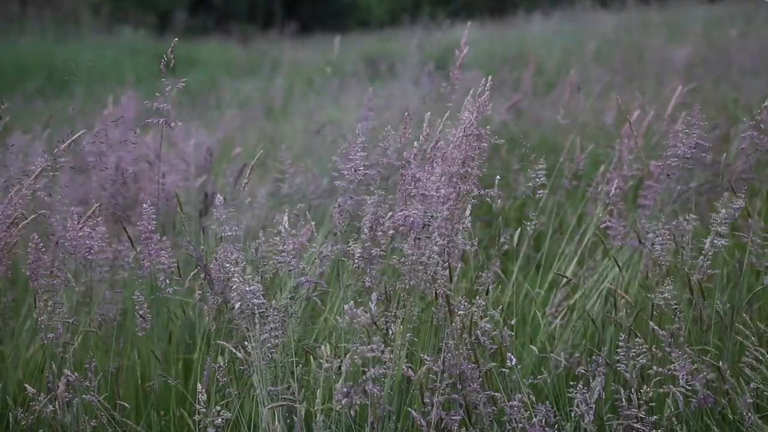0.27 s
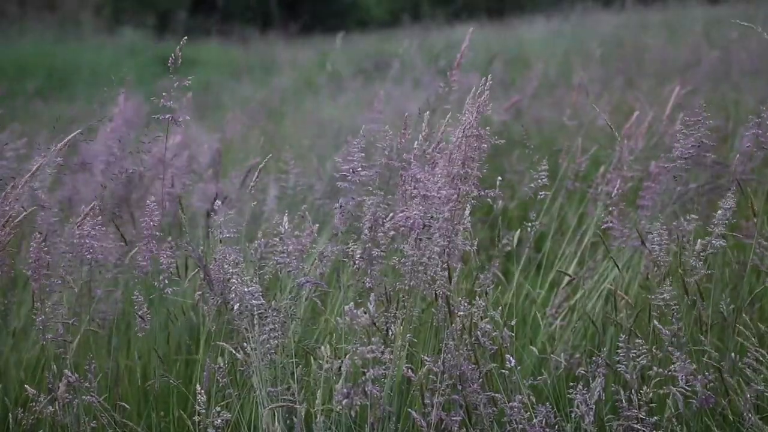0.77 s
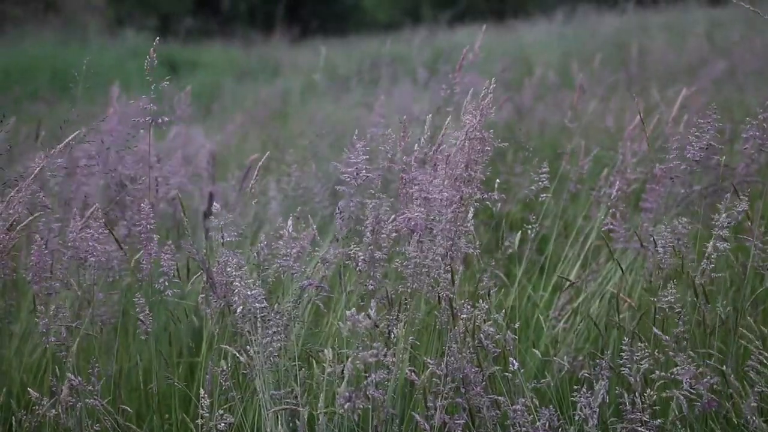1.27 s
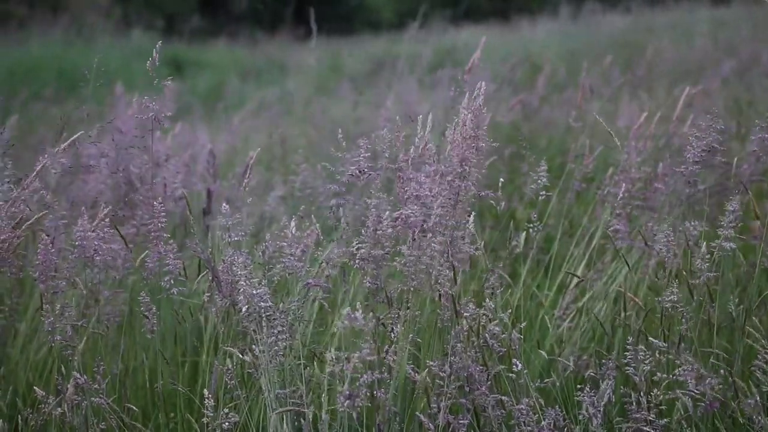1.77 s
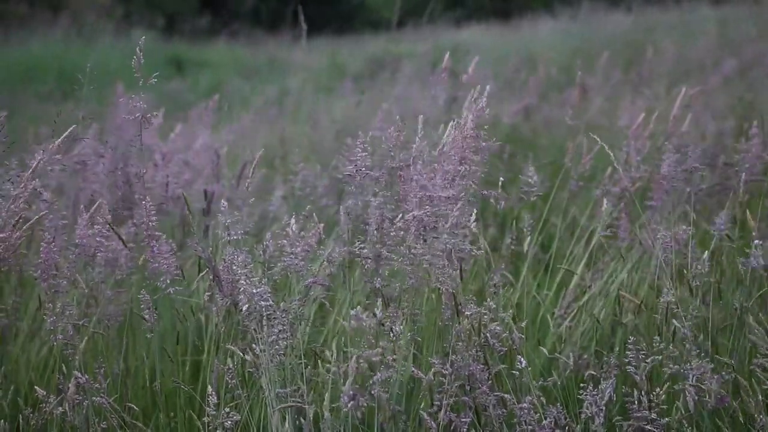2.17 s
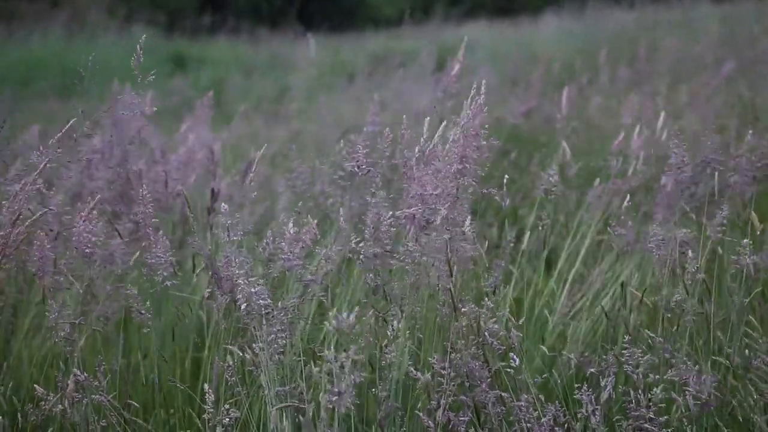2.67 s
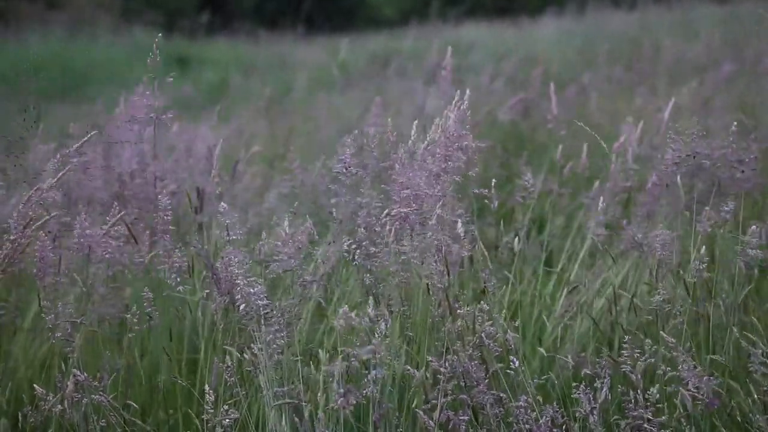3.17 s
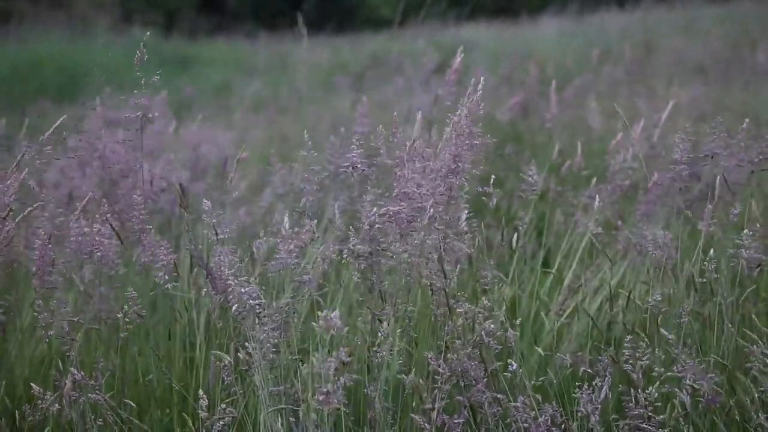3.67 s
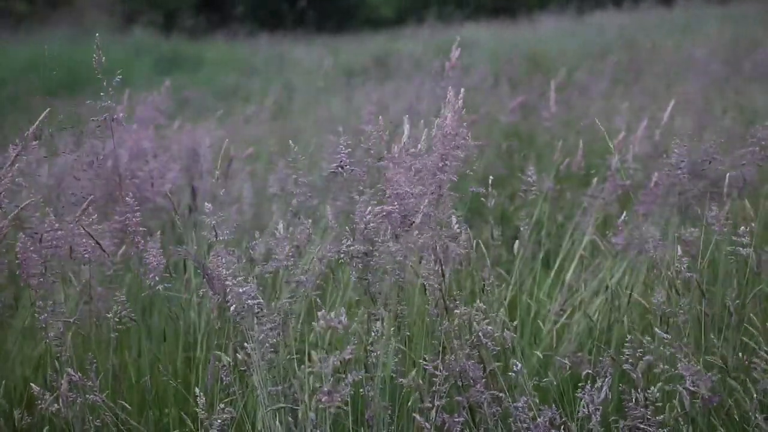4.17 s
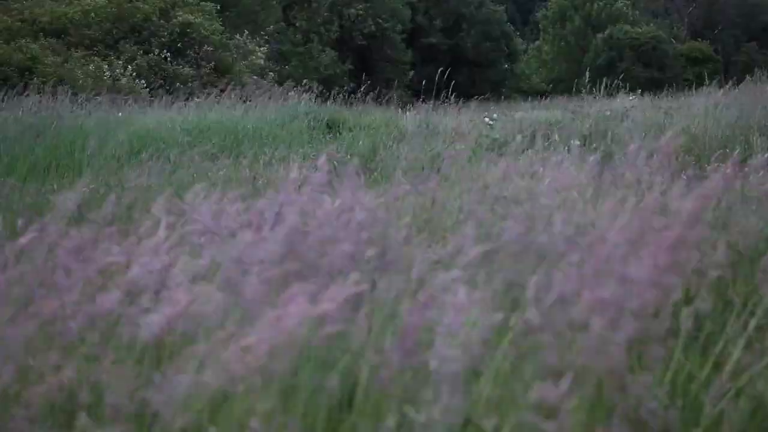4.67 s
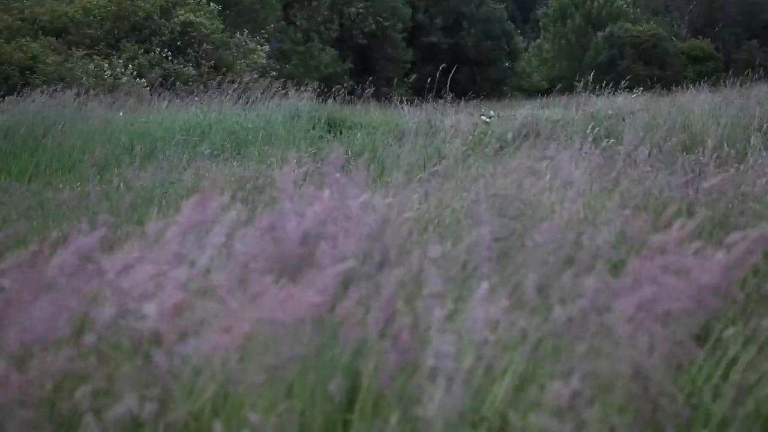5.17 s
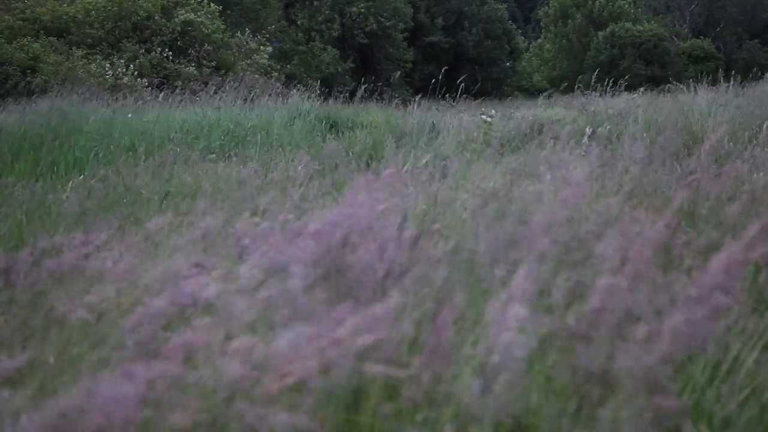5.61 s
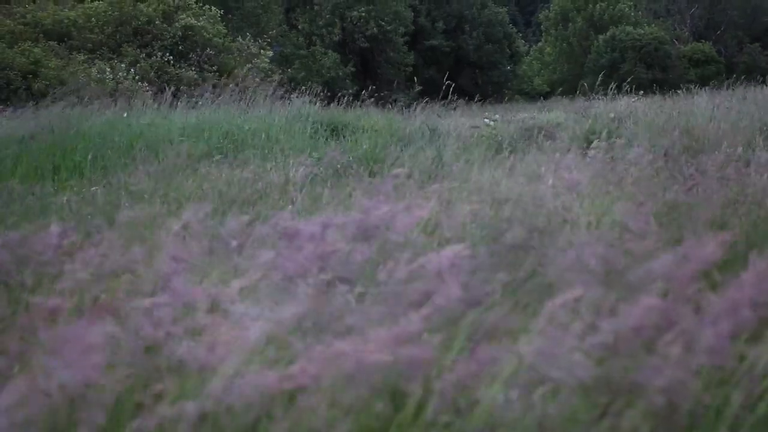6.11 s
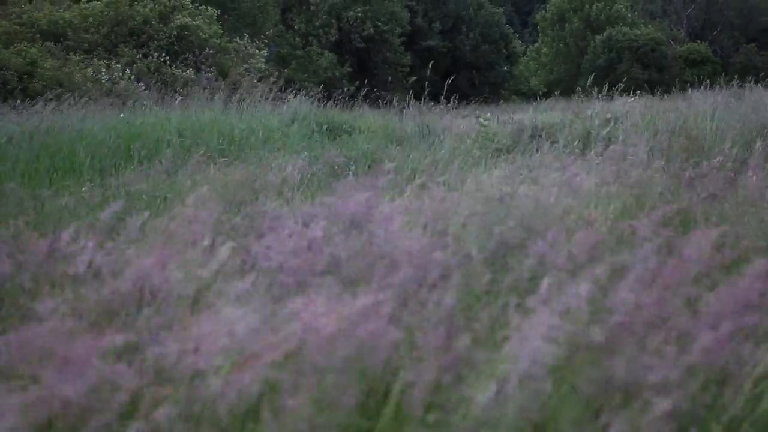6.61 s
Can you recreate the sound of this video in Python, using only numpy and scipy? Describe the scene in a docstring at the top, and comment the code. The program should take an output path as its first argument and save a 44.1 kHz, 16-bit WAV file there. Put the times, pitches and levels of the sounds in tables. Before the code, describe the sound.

Wind gusts buffet a bare microphone in heavy irregular low thumps and rumbles over softly hissing meadow grass, with a small click at a mid-way cut.

```python
"""Grass hisses softly in a meadow, with microphone noise and a low hum behind it. Gusts soon press
on the bare microphone as random eddies of four sizes, with thumps, puffs and near-regular swings;
the strongest overload it into flat tops. From 2.4 s faint insect buzzes, made of narrow noise, come
and go. At 4.57 s a splice clicks with a pressure step: the hum stops and the grass is quieter,
while gusts go on and the insect returns near the end."""
import sys
import numpy as np
from scipy.fft import rfft, irfft, next_fast_len
from scipy.io import wavfile
from scipy.ndimage import uniform_filter1d, map_coordinates

SR = 44100
rng = np.random.default_rng(int(sys.argv[2]) if len(sys.argv) > 2 else 0)


def persist_wave(psi):
    """Save psi, clipped to +-1, as 16-bit WAV."""
    counts = np.round(np.clip(psi, -1, 1) * 32767).astype(np.int16)
    wavfile.write(sys.argv[1], SR, np.atleast_2d(counts).T)


N = 302085
SECONDS = np.arange(N) / SR  # the time of each sample
SPLICE_S = 4.5741


def amp(db):
    """Turn dB into a gain."""
    return 10 ** (np.asarray(db) / 20)


def unit(x):
    """Scale a sound to an average (rms) strength of 1."""
    return x / np.sqrt(np.mean(x ** 2) + 1e-20)


def curves(rows):
    """Join the points of each column after the time into a curve with one value per sample."""
    times, *columns = np.transpose(rows)
    return [np.interp(SECONDS, times, column) for column in columns]


def wobble(rate):
    """Draw a smooth random curve through `rate` random points a second."""
    points = rng.standard_normal(int(N * rate / SR) + 4)
    return map_coordinates(points, [np.arange(N) * rate / SR])


def filtered(x, response):
    """Multiply each frequency of x by the gain that response(hz) gives."""
    size = next_fast_len(N + SR // 2)  # room for the filter to ring out
    gain = response(np.fft.rfftfreq(size, 1 / SR))
    return irfft(rfft(x, size) * gain, size)[..., :N]


def coloured(x, spectrum):
    """Shape x by (Hz, dB) points joined on a log frequency axis, then scale it to rms 1."""
    points_hz, points_db = np.transpose(spectrum)

    def response(hz):
        return amp(np.interp(np.log(hz + 1), np.log(points_hz + 1), points_db))

    return unit(filtered(x, response))


def grass():
    """Distant blades rub in the wind: a smooth hiss with a slight flutter and brief dips."""
    # Hiss level, quieter after the splice. Each row: time in seconds, level in dB before flutter and dips.
    grass_level = [(0, -50.5), (1.2, -48.5), (2.5, -48), (3.05, -49.5), (3.5, -47.5), (4.15, -49),
                   (4.573, -49), (4.575, -51.5), (5, -50), (6.2, -51.5), (6.85, -51)]
    # Tone of the rubbing blades. Each row: frequency in Hz, relative level in dB per Hz.
    blades = [(90, -23), (200, 0), (600, -1.5), (1100, -3.5), (1900, -7.5), (3500, -6.5), (5800, -7),
              (7000, -12), (9000, -15), (10500, -23.5), (16000, -35)]
    # Short dips of the hiss. Each row: time of the middle in seconds, depth in dB.
    dips = [(1.56, -7.5), (2.16, -7), (3.13, -5)]
    half_dip_s = 0.063
    level_db = curves(grass_level)[0]
    for middle_s, depth_db in dips:
        level_db = level_db + depth_db * np.clip(1 - np.abs(SECONDS - middle_s) / half_dip_s, 0, 1)
    flutter_db = 0.63 * wobble(8) + 0.49 * wobble(35)
    return amp(level_db + flutter_db) * coloured(rng.standard_normal(N), blades)


def circuit():
    """The microphone's own hiss: steady noise with a fixed tone."""
    # Tone of the hiss. Each row: frequency in Hz, relative level in dB per Hz.
    circuit_tone = [(300, -32), (3000, 2), (9000, -2.5), (13000, -0.5), (16000, -2.5)]
    level_db = -63.5
    return amp(level_db) * coloured(rng.standard_normal(N), circuit_tone)


def hum():
    """Two sine tones an octave apart waver slightly in pitch and level, and stop at the splice."""
    # The tones. Each row: frequency in Hz, level in dB rms before the fade.
    tones = [(118.4, -51), (236.9, -78)]
    # Rise and fall of both tones. Each row: time in seconds, change in dB before the random wavering.
    fade = [(0, -3), (.3, -0.5), (.45, -8.5), (.9, -2), (1.3, -15), (3.7, -10), (4.3, -11), (4.57, -10)]
    turn = 2 * np.pi * SECONDS + 0.0034 * wobble(3.74)
    # the root of 2 turns an rms level into a sine's peak
    tone = sum(np.sqrt(2) * amp(db) * np.sin(hz * turn) for hz, db in tones)
    fade_db = curves(fade)[0] + 0.71 * wobble(7.6)
    return tone * amp(fade_db) * (SECONDS < SPLICE_S)


def peaks(rows, rise_db_s, fall_db_s):
    """Follow the loudest of (s, dB, held s) events: each rises straight in dB, holds, falls straight."""
    level_db = np.full(N, -200.)
    for start, db, held in rows:
        rise_db = rise_db_s * np.maximum(start - SECONDS, 0)
        fall_db = fall_db_s * np.maximum(SECONDS - start - held, 0)
        level_db = np.maximum(level_db, db - rise_db - fall_db)
    return level_db


def together(a_db, b_db):
    """Add the powers of two unrelated sounds and give the level in dB."""
    return 10 * np.log10(amp(2 * a_db) + amp(2 * b_db))


def strengths():
    """Levels of the four eddy sizes; in steady wind the finest grow most steeply with its strength."""
    # The wind. Each row: time in seconds, strength in dB of the middle eddies, large eddies over it in dB.
    wind = [(.1, -62, 14), (.4, -62, 1), (.84, -59.5, 18), (.95, -37, 18), (1.15, -42, 9),
            (1.26, -26.5, 3.5), (1.34, -45, 12), (1.52, -43, 8), (1.6, -26, 8), (1.75, -21, 5.5),
            (1.9, -25, -0.5), (1.99, -16.5, -12), (2.09, -26, 8), (2.14, -12.5, -6), (2.24, -19.5, 4),
            (2.3, -28, 13.5), (2.41, -19, 0), (2.5, -41, 16), (2.57, -39, 13), (2.61, -18, -4),
            (3.0, -21.5, -5.5), (3.22, -28, 5), (3.3, -18.5, -5), (3.47, -30.5, 8.5), (3.56, -34, 6),
            (3.65, -43.5, 8.5), (3.84, -55, 11), (4.15, -56, 13.5), (4.27, -36.5, 12), (4.31, -13.5, 0.5),
            (4.46, -23.5, 3.5), (4.57, -33.5, -1), (4.6, -53.5, 20), (4.82, -37, 3), (5.04, -21, -7),
            (5.41, -18.5, -6), (5.58, -24, -0.5), (5.65, -36, 6.5), (5.75, -24, -2), (6.15, -33.5, -1.5),
            (6.4, -18, -3), (6.48, -22.5, 2.5), (6.62, -20.5, 6), (6.77, -20, -3), (6.85, -33, 8)]
    # Puffs of fine turbulence. Each row: start of the hold in seconds, small eddies in dB,
    # hold in seconds, sharpness (extra level of the finest eddies) in dB.
    puffs = [(1.19, -43, .02, 0), (1.26, -53, .02, 0), (1.69, -25.5, 0.034, 1), (1.77, -32.5, 0.083, 5.5),
             (1.96, -23.5, 0.009, -4), (2.03, -27.5, 0.0079, -1), (2.145, -23, 0.013, 1),
             (2.2, -25, 0.028, -1), (2.38, -24.5, 0.029, 3), (2.61, -34.5, 0.024, 4),
             (2.729, -22, 0.017, 3.5), (2.83, -32, 0.0092, 3), (2.93, -29.5, 0.016, -5),
             (2.99, -36, .05, 8), (3.11, -38, .03, -3), (3.3, -28, 0.025, 3.5), (3.41, -33.5, 0.022, -3),
             (4.306, -21, .03, 2.5), (4.37, -26.5, .07, -3), (4.49, -37.5, 0.017, 5), (4.87, -35, .01, 0),
             (4.95, -27, 0.035, -2), (5.2, -22, 0.04, 0.5), (5.33, -31.5, 0.12, 2.5),
             (5.49, -25.5, 0.043, -5), (5.66, -30.5, 0.069, -3.5), (5.77, -30, 0.063, 0.5),
             (6.1, -35.5, 0.06, 0), (6.25, -33.5, 0.049, -4), (6.35, -25, 0.054, 3),
             (6.57, -29.5, 0.1, -3.5), (6.8, -26, .05, -3)]
    # Single large eddies that thump. Each row: start of the hold in seconds, level in dB, hold in seconds.
    thumps = [(.92, -20, .04), (1.06, -23, .03), (1.29, -26, 0.0084), (1.53, -15, .01), (1.62, -13, 0.073),
              (1.96, -10, 0.0089), (2.03, -8.5, 0.042), (2.27, 1, 0.05), (2.67, -8.5, 0.061),
              (2.97, -9.5, 0.012), (3.12, -11.5, .01), (3.24, -13, 0.018), (3.39, -8, 0.028),
              (3.52, -26, .06), (4.18, -33, .02), (4.45, -21, 0.063), (4.9, -16.5, 0.063),
              (5.41, -13.5, .02), (5.55, -27.5, .08), (5.78, -26, .03), (5.99, -25, 0.047),
              (6.19, -17.5, 0.0065), (6.28, -8, .02), (6.6, -5, 0.032), (6.8, -21, 0.033)]
    reference_db = -20
    small_at_reference_db, small_growth = -32.5, 0.99  # growth in dB per dB of wind
    finest_at_reference_db, finest_growth = -33.5, 1.4  # growth in dB per dB of small eddies
    puff_middle_db = 1.5  # middle eddies in a puff, over the small ones

    def finest_from(small_db):
        return finest_at_reference_db + finest_growth * (small_db - reference_db)

    wind_db, large_over_db = curves(wind)
    puff_db = peaks([row[:3] for row in puffs], rise_db_s=605, fall_db_s=457)
    edges = [(start, finest_from(db) + sharp_db, held) for start, db, held, sharp_db in puffs]
    edge_db = peaks(edges, rise_db_s=802, fall_db_s=600)
    thump_db = peaks(thumps, rise_db_s=450, fall_db_s=401)
    steady_db = small_at_reference_db + small_growth * (wind_db - reference_db)
    large_db = together(wind_db + large_over_db, thump_db)
    middle_db = together(wind_db, puff_db + puff_middle_db)
    small_db = together(steady_db, puff_db)
    finest_db = together(finest_from(steady_db), edge_db)
    return large_db, middle_db, small_db, finest_db


def swings():
    """Hard gusts swing the diaphragm, inward first; also gives how far a swing takes over (0-1)."""
    # The swings. Each row: start in seconds, frequency in Hz,
    # peak in dB before shaping and smoothing, length in seconds.
    swing_rows = [(.6, 12.5, -35, .09), (1.64, 30, -1.5, .06), (2.131, 80, -4, .02), (2.144, 29.5, .5, .11),
                  (2.254, 25.5, -2.5, .105), (2.697, 30, -6, .09), (4.296, 44, -5, .04),
                  (5.197, 29, -7, .055), (6.247, 31, -10.5, .06), (6.377, 88, -10, .035),
                  (6.555, 31, -8, .12)]
    push, shapes = np.zeros(N), []
    for start, hz, db, length in swing_rows:
        since = SECONDS - start
        arch = np.sin(np.pi * np.clip(since / length, 0, 1)) * (since < length)
        shape = np.tanh(3 * arch)  # quicker ends, flatter middle
        push -= amp(db) * shape * np.sin(2 * np.pi * hz * since)
        shapes.append(shape)
    return uniform_filter1d(push, size=60), np.max(shapes, axis=0)


def eddies(spectrum, span, lumps_db):
    """Random pressure from a stream of eddies: evened out over about span seconds, then made lumpy."""
    flow = coloured(rng.standard_normal(N), spectrum)
    width = int(span * SR)
    power = uniform_filter1d(uniform_filter1d(flow ** 2, width), width)
    even = flow / np.sqrt(np.abs(power) + 0.03)
    return unit(even * amp(lumps_db))


def buffeting():
    """Eddies of four sizes press on the diaphragm; all but the large share bunches of turbulence."""
    # Pressure tone of the slow air rolls and of the four eddy sizes.
    # Each row: frequency in Hz, relative level in dB per Hz.
    slow_tone = [(2, -33), (6, -10), (14, 4), (28, -1), (45, -27), (120, -79)]
    large_tone = [(2, -40), (6, -4.5), (15, 0), (28, 1), (42, -11.5), (60, -31), (120, -88)]
    middle_tone = [(25, -40), (42, 2), (60, 1), (110, -4.5), (140, -29), (300, -95)]
    small_tone = [(80, -51), (120, 1.5), (200, -5), (310, -16.5), (400, -42), (900, -74), (2000, -120)]
    finest_tone = [(220, -39), (330, 5), (450, -3), (700, -22.5), (1200, -36.5), (3000, -59), (6000, -120)]
    large_db, middle_db, small_db, finest_db = strengths()
    bunch = wobble(30)
    push, busy = swings()
    busy = np.clip(1.5 * uniform_filter1d(busy, size=900), 0, 1)
    # the stronger the large eddies, the faster they pass: blend from slow rolls to quicker ones
    fast = np.clip((large_db + 47.5) / 28, 0, 1) * np.pi / 2
    slow_rolls = np.cos(fast) * eddies(slow_tone, 0.058, 0.43 * wobble(5.5))
    quick_rolls = np.sin(fast) * eddies(large_tone, 0.063, 0.82 * wobble(10))
    # a swing pushes back the large and middle eddies while it lasts
    large = amp(large_db - 16 * busy) * (slow_rolls + quick_rolls)
    middle = amp(middle_db - 5 * busy) * eddies(middle_tone, 0.036, 1.5 * bunch + 1.5 * wobble(14))
    small = amp(small_db) * eddies(small_tone, 0.034, 1.3 * bunch + 0.91 * wobble(50))
    finest = amp(finest_db) * eddies(finest_tone, 0.07, 0.84 * bunch + 1.25 * wobble(80))
    return push + large + middle + small + finest


def insect():
    """Faint buzzes from far in the grass: a narrow band of noise that swells and fades."""
    # The buzzes. Each row: start in seconds, end in seconds, level in dB at the height of the swell.
    buzzes = [(2.4, 2.6, -67), (2.75, 3.05, -62), (6.3, 6.5, -65), (6.55, 6.9, -63)]
    pitch_hz, width_hz = 3550, 65
    swell = np.zeros(N)
    for start, end, db in buzzes:
        swell += amp(db) * np.sin(np.pi * np.clip((SECONDS - start) / (end - start), 0, 1))
    noise = filtered(rng.standard_normal(N), lambda hz: np.exp(-((hz - pitch_hz) / width_hz) ** 2))
    return swell * unit(noise)


def splice():
    """A click where two pressures meet: it leans down, jumps up through zero and relaxes."""
    step_db, relax_s = -26.5, 0.005  # size of the whole jump
    since = SECONDS - SPLICE_S
    return amp(step_db) * np.sign(since) * np.exp(-np.abs(since) / relax_s) / 2


def scene():
    """Add up everything at the microphone, as one channel."""
    return (buffeting() + grass() + circuit() + hum() + insect() + splice())[None]


def record(dry):
    """Mute the opening, cut overloads into flat tops, then remove everything above the top frequency."""
    start_s, overload, top_hz = .069, .598, 15750  # overload is a sample value
    live = dry * (np.arange(N) >= start_s * SR)
    return filtered(np.clip(live, -overload, overload), lambda hz: hz < top_hz)


dry = scene()
out = record(dry)
persist_wave(out)
```